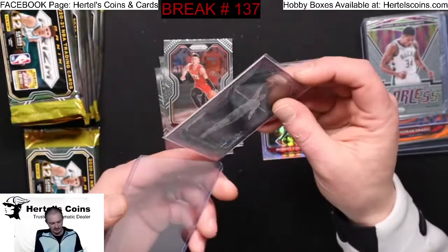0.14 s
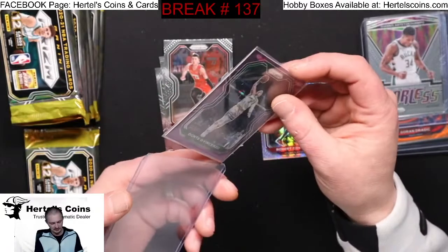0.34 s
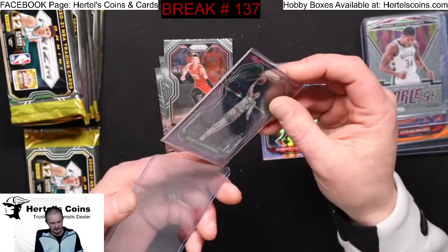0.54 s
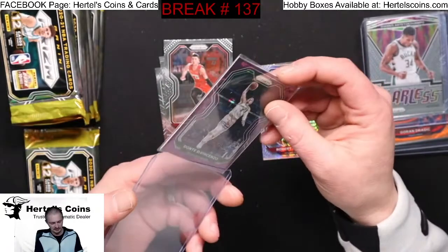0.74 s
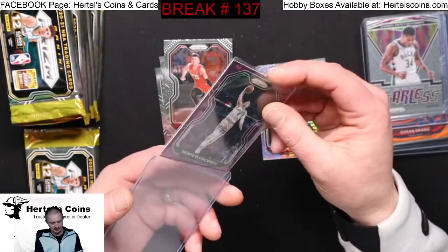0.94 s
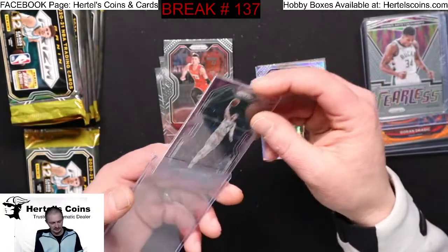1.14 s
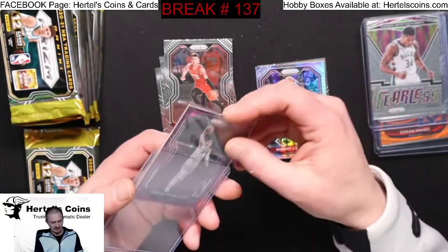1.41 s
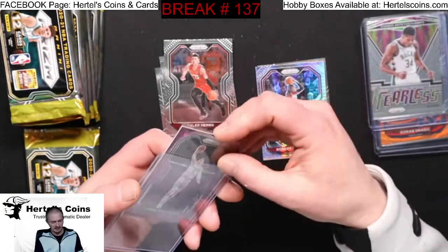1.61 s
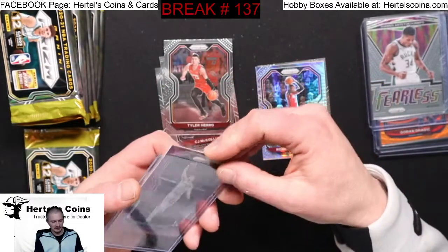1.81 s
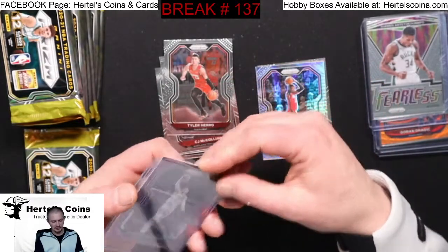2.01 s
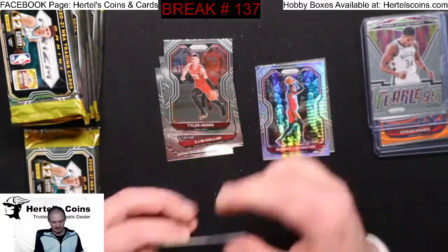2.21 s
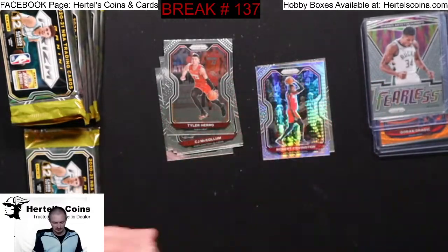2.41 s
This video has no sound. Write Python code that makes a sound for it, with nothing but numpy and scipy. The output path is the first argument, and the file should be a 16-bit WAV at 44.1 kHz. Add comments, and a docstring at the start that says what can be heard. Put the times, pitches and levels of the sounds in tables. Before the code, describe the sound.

A trading card is worked into a thin plastic sleeve, with faint hissing strokes and small crisp snaps, then knocked once, very loudly, on a table; small quiet room with low hum, close microphone.

```python
"""Card into a sleeve, then onto the table

In a small room with a low hum, close to the microphone, a trading card is worked into a thin plastic sleeve.
Its edge ticks and its strokes hiss (filtered noise with stick-slip grains); the plastic snaps in short bursts.
Hands bump the table softly (dull noise bursts and a decaying low mode); then the sleeved card is knocked
hard on the table top, which rings (decaying modes) and sets the microphone stand booming (two low modes).
"""
import sys
import numpy as np
from scipy import signal
from scipy.fft import rfft, irfft
from scipy.io import wavfile

SR = 44100
rng = np.random.default_rng(int(sys.argv[2]) if len(sys.argv) > 2 else 0)


def dump(signal):
    """Clip the signal to [-1, 1] and save it as 16-bit WAV at the path in sys.argv[1]."""
    limited = np.clip(np.atleast_2d(signal).T, -1, 1)
    pcm = np.round(limited * 32767).astype(np.int16)
    wavfile.write(sys.argv[1], SR, pcm)


N = 112454
T = np.arange(N) / SR  # time in seconds
HZ = np.maximum(np.arange(N // 2 + 1) * SR / N, 1)  # frequency of each spectrum bin
MIC_WIDTH = 0.44  # side part against mid in the stereo noise
CARD_PAN_DB = 2  # the card and sleeve sit slightly left
ROOM_T60_S, ROOM_GAP_S = 0.19, 0.0033  # decay by 60 dB, wait before the first reflection


def amp(db):
    """Decibels to gain."""
    return 10 ** (np.asarray(db) / 20)


def curve(points):
    """Gain at every frequency, interpolated over log frequency from (Hz, dB) points."""
    hz, db = np.array(points, float).T
    return amp(np.interp(np.log(HZ), np.log(hz), db))


def colour(x, gain):
    """Causal minimum-phase filter with the given gain shape; white noise keeps its power."""
    level = np.sqrt(np.mean(gain ** 2))
    cepstrum = irfft(np.log(gain / level + 1e-4), N)
    # folding the cepstrum onto positive times makes the filter causal
    cepstrum[1:N // 2] *= 2
    cepstrum[N // 2 + 1:] = 0
    response = irfft(np.exp(rfft(cepstrum)), N)[None, :SR // 10]
    return signal.fftconvolve(x, response, axes=1)[:, :N]


def noise(width):
    """Two channels of white noise, alike but for a side part."""
    mid, side = rng.standard_normal((2, N))
    return np.array([mid + width * side, mid - width * side]) / np.hypot(1, width)


def pan(db):
    """Channel gains for a left-minus-right level."""
    return amp(np.array([[db], [-db]]) / 2)


def fade(start, decay):
    """Sudden start, exponential decay."""
    return (T >= start) * np.exp(-np.maximum(T - start, 0) / decay)


def swell(peak, rise, fall):
    """A rounded rise to a peak and fall from it."""
    distance = np.maximum((peak - T) / rise, (T - peak) / fall)
    return np.exp(-distance ** 1.2)


def ring(start, modes, rise):
    """Decaying modes that build up after a blow."""
    age = np.maximum(T - start, 0)
    total = 0
    for hz, db, t60 in modes:
        decay = np.exp(-np.log(1000) * age / t60)
        total = total + amp(db) * np.sin(2 * np.pi * hz * age) * decay
    return (1 - np.exp(-age / rise)) * total


def room(x, wet_db):
    """Adds the short diffuse answer of the room: convolution with decaying noise."""
    tail = noise(MIC_WIDTH) * fade(ROOM_GAP_S, ROOM_T60_S / np.log(1000))
    tail = tail[:, :SR // 2]
    tail = tail / np.sqrt(np.sum(tail ** 2) / 2)
    return x + amp(wet_db) * signal.fftconvolve(x, tail, axes=1)[:, :N]


# Spectrum of the room's rumble and hiss. Each row: frequency in Hz, relative gain in dB.
AIR_COLOUR = [(20, -15), (31, -2.5), (42, 6), (62, -1), (78, -11), (115, -10.5), (150, -13), (200, -13),
              (335, -16), (450, -22.5), (640, -25), (1100, -31), (2000, -37), (5000, -42.5), (16000, -42.5)]
# Hum tones of the room. Each row: frequency in Hz, level in dB.
HUM_TONES = [(59.5, -66), (119.5, -74.5), (272, -83.5), (490, -83)]
AIR_DB, AIR_WIDTH, HUM_PAN_DB = -59.5, 0.57, -10
AIR_BASS_PAN_DB, AIR_BASS_HZ = 6, 111  # the rumble leans left, less so as pitch rises


def background():
    """Room rumble and faint hiss as shaped noise, and an electrical hum of steady sines."""
    air = amp(AIR_DB) * colour(noise(AIR_WIDTH), curve(AIR_COLOUR))
    lean_db = AIR_BASS_PAN_DB / (1 + (HZ / AIR_BASS_HZ) ** 2)
    air = irfft(rfft(air) * amp(np.array([lean_db, -lean_db]) / 2), N)
    hum = 0
    for hz, db in HUM_TONES:
        hum = hum + amp(db) * np.sqrt(2) * np.sin(2 * np.pi * (hz * T + rng.random()))
    return air + pan(HUM_PAN_DB) * hum


# Jolts of the table, before they reach the stand. Each row: time in seconds, level in dB.
JOLTS = [(0.237, -34.5), (.31, -47), (0.783, -44), (1.124, -46.5), (1.163, -42), (1.255, -40.5),
         (1.411, -43), (1.466, -41.5), (1.584, -47), (2.4786, -9.5)]
# Resonances of the microphone stand. Each row: frequency in Hz, level in dB, 60 dB decay in seconds.
STAND_MODES = [(52.6, -0.5, .23), (40, -14, 0.49)]
STAND_RISE_S, STAND_LAG_S, STAND_PAN_DB = 0.0087, 0.01, 11.5


def stand():
    """Jolts of the table reach the microphone stand a moment later and make it boom, mostly on the left."""
    boom = sum(amp(db) * ring(s + STAND_LAG_S, STAND_MODES, STAND_RISE_S) for s, db in JOLTS)
    return -pan(STAND_PAN_DB) * boom


# Soft bumps of the hands on the table. Each row: start in seconds, level in dB.
BUMPS = [(0.2299, -48.5), (0.782, -51), (1.379, -55.5), (1.407, -58.5)]
# Spectrum of a bump. Each row: frequency in Hz, relative gain in dB.
BUMP_COLOUR = [(100, 2), (300, -6.5), (440, 11), (560, -7.5), (750, -8.5), (1200, -14), (2000, -31),
               (8000, -43)]
# Dull thumps of the fingers. Each row: start in seconds, level in dB.
THUMPS = [(2.215, -47.5)]
# Resonance of a thump. Each row: frequency in Hz, level in dB, 60 dB decay in seconds.
THUMP_MODES = [(114, 2, 0.1)]
BUMP_DECAY_S = 0.0072


def hands():
    """Padded contacts: hands give short dull noise bursts, fingers a low decaying mode."""
    bump_level = sum(amp(db) * fade(s, BUMP_DECAY_S) for s, db in BUMPS)
    bumps = colour(noise(MIC_WIDTH) * bump_level, curve(BUMP_COLOUR))
    thumps = sum(amp(db) * ring(s, THUMP_MODES, rise=0.0038) for s, db in THUMPS)
    return bumps + thumps


GRAINS_PER_S, GRAIN_SHARE = 1800, 0.3  # share of the power in grains, the rest is smooth rub
CATCH_PER_S, CATCH_DB = 75, 1.5  # how often the grip is redrawn, and its spread


def friction():
    """Dense stick-slip grains over a smooth rub that catches and lets go."""
    hits = rng.random(N) < GRAINS_PER_S / SR
    grains = hits * rng.standard_normal(N) * np.sqrt(SR / GRAINS_PER_S)
    grip_db = CATCH_DB * np.interp(T * CATCH_PER_S, np.arange(N), rng.standard_normal(N))
    rub = noise(MIC_WIDTH)
    return amp(grip_db) * (np.sqrt(GRAIN_SHARE) * grains + np.sqrt(1 - GRAIN_SHARE) * rub)


# Strokes of the card inside the sleeve, close to the microphone. Each row: peak time in seconds,
# level in dB, rise in seconds, fall in seconds, tilt in dB per octave, edge rasp in dB.
STROKES = [(.69, -70, 0.038, 0.022, -1, -8), (.765, -71, 0.018, 0.028, -3.5, 0),
           (.868, -69, .008, 0.0096, 1.5, -12), (1.01, -70.5, 0.028, 0.056, 1, 0),
           (1.19, -63.5, .11, 0.2, 1.5, -2), (1.40, -78, 0.021, .04, 2, 10),
           (1.487, -65.5, 0.037, 0.018, 0.5, 4.5), (1.579, -66.5, 0.022, 0.074, -0.5, 10),
           (1.702, -59.5, 0.038, 0.054, -0.5, 4.5), (1.874, -67, 0.073, .04, -3, 3),
           (2.006, -64, 0.061, 0.023, -3.5, -11), (2.041, -63, 0.014, 0.024, -1, 0),
           (2.21, -69, 0.11, 0.076, -3.5, 4.5), (2.441, -72, 0.081, 0.09, -5.5, 0)]
# Spectrum of the sliding card. Each row: frequency in Hz, relative gain in dB.
SLIDE_COLOUR = [(500, -15), (1500, -9), (3500, -5), (5500, -5), (7000, -0.5), (10500, -2.5), (14000, -2.5),
                (16000, -9.5)]
# The sleeve flexing under the fingers. Each row: peak time in seconds, level in dB, rise in seconds,
# fall in seconds.
FLEXES = [(1.237, -49, 0.00084, 0.0027), (1.7103, -45.5, .0007, 0.0012), (1.7182, -50, 0.00098, 0.0027),
          (1.7227, -48.5, 0.0015, 0.0055), (1.8437, -54.5, .001, .003), (1.9639, -53.5, .001, 0.0027),
          (2.015, -56, .002, 0.0027), (2.176, -57, 0.0012, 0.011), (2.215, -56.5, 0.0072, 0.0088),
          (2.22, -46.5, 0.0029, 0.0047)]
# Spectrum of the flexing plastic. Each row: frequency in Hz, relative gain in dB.
FLEX_COLOUR = [(300, -9), (1050, -3), (1380, -1.5), (1600, -5), (1800, 5), (2000, -2.5), (2400, -3),
               (4700, -0.5), (5800, -9.5), (7500, 2.5), (11000, -12), (16000, -12)]
SLIDE_PIVOT_HZ, SLIDE_WET_DB = 8000, -10.5  # where the tilt is zero, level of the room's answer
RASP_HZ, RASP_WIDTH_HZ = 8100, 680


def sleeve():
    """The card slides in by strokes, its edge rasping; the sleeve creaks briefly where it is bent."""
    rub, shape = friction(), curve(SLIDE_COLOUR)
    octaves = np.log2(np.maximum(HZ, 1000) / SLIDE_PIVOT_HZ)
    rasp = 1 / (1 + ((HZ - RASP_HZ) / RASP_WIDTH_HZ) ** 2)
    slide = 0
    for s, db, rise, fall, tilt, rasp_db in STROKES:
        stroke_shape = shape * amp(tilt * octaves + rasp_db * rasp)
        slide = slide + amp(db) * colour(rub * swell(s, rise, fall), stroke_shape)
    flex_level = sum(amp(db) * swell(s, rise, fall) for s, db, rise, fall in FLEXES)
    flex = colour(friction() * flex_level, curve(FLEX_COLOUR))
    return room((slide + flex) * pan(CARD_PAN_DB), SLIDE_WET_DB)


# Snaps of card edge and sleeve, close to the microphone. Each row: start in seconds, level in dB,
# centre in Hz, spread in octaves, decay in seconds.
TICKS = [(0.2819, -53.5, 6500, 1.3, 0.0025), (.661, -54.5, 10200, 1.5, 0.0023),
         (0.7752, -55, 8100, 0.6, 0.0031), (1.2354, -41.5, 8300, 0.4, 0.0012),
         (1.705, -44.5, 8900, 1.1, 0.0041), (1.7115, -28.5, 9260, 0.54, 0.0022),
         (1.8427, -47, 5370, 0.74, 0.0028), (1.85, -53, 5900, 0.47, 0.0028),
         (1.8742, -53.5, 6200, 0.71, 0.0013), (1.9642, -48.5, 4360, 0.39, 0.0018),
         (2.019, -38, 11900, 0.94, 0.0033), (2.112, -61, 7500, 1.2, 0.0021),
         (2.149, -63.5, 5730, 1.8, 0.0061), (2.2687, -63, 1550, .6, 0.0078)]
TICK_SPIKE, TICK_WET_DB = 0.36, -10.5  # spike against chatter, level of the room's answer


def ticks():
    """Each snap is a spike and a few milliseconds of chatter in the stiff plastic."""
    out = 0
    for s, db, hz, spread, decay in TICKS:
        snap = noise(MIC_WIDTH) * fade(s, decay)
        snap[:, int(s * SR)] += TICK_SPIKE * np.sqrt(decay * SR)
        band = 1 / (1 + (np.log2(HZ / hz) / spread) ** 2)
        out = out + amp(db) * colour(snap, band)
    return room(out * pan(CARD_PAN_DB), TICK_WET_DB)


# The card's edge lands on the table, then its other corner. Each row: start in seconds, level in dB.
CONTACTS = [(2.478, 3), (2.4809, -7.5)]
# Clack of the card. Each row: frequency in Hz, level in dB, 60 dB decay in seconds.
CARD_MODES = [(1090, -11.5, 0.0076), (1390, -12, 0.013)]
# Spectrum of the crack. Each row: frequency in Hz, relative gain in dB.
CRACK_COLOUR = [(300, 10.5), (1000, 4), (1400, 9), (1800, -7), (2700, 0), (4200, -8.5), (6000, -7.5),
                (7500, -14), (8800, -7.5), (11000, -18), (16000, -27)]
# Resonances of the table top. Each row: frequency in Hz, level in dB, 60 dB decay in seconds,
# left minus right in dB.
TABLE_MODES = [(206.2, -30.5, 0.58, 22.5), (290.5, -25, 0.21, -2), (385.3, -13, 0.048, -9.5),
               (613.5, -11, 0.071, 6.5), (708, -18.5, 0.064, 14), (872, -26, 0.055, 2),
               (1040, -26.5, .07, 0), (1417, -32, 0.086, -1), (1530, -46, 0.043, 1), (1880, -47, 0.15, 0),
               (2226, -36.5, 0.22, 0), (2924, -27, 0.042, -5), (2865, -33, 0.083, -9)]
# Spectrum of the room's answer to the knock. Each row: frequency in Hz, relative gain in dB.
TAIL_COLOUR = [(60, 0), (105, 4), (155, -5.5), (280, 7), (700, 2.5), (1400, -6.5), (1750, -11.5),
               (3700, -18), (6000, -30.5), (10000, -35), (16000, -51)]
CONTACT_S, PUSH_DB, CRACK_DB, CRACK_S, RING_RISE_S = 0.00081, -5, -13, 0.0016, 0.00055
TAIL_DB, TAIL_T60_S, TAIL_WIDTH = -18.5, 0.23, 0.7


def table():
    """Each contact gives a push, a crack and a clack of the card; the first rings table top and room."""
    out, first = 0, CONTACTS[0][0]
    for s, db in CONTACTS:
        push = amp(PUSH_DB) * np.sin(np.pi * np.clip((T - s) / CONTACT_S, 0, 1)) ** 2
        crack = amp(CRACK_DB) * colour(noise(MIC_WIDTH) * fade(s, CRACK_S), curve(CRACK_COLOUR))
        clack = ring(s + CONTACT_S / 4, CARD_MODES, rise=.0001)
        out = out + amp(db) * (crack - push - clack)
    top = 0
    for hz, db, t60, side_db in TABLE_MODES:
        top = top + pan(side_db) * ring(first, [(hz, db, t60)], RING_RISE_S)
    tail = noise(TAIL_WIDTH) * fade(first + ROOM_GAP_S, TAIL_T60_S / np.log(1000))
    return out - top + amp(TAIL_DB) * colour(tail, curve(TAIL_COLOUR))


def scene():
    """All sounds at the microphone."""
    return background() + stand() + hands() + sleeve() + ticks() + table()


TOP_HZ = 16000


def record(dry):
    """The recorder clips just below full scale, then a steep low-pass cuts the top."""
    clipped = np.clip(dry, -.97, .97)
    low_pass = signal.ellip(10, .2, 80, TOP_HZ, fs=SR, output="sos")
    return signal.sosfilt(low_pass, clipped)


dry = scene()
out = record(dry)
dump(out)
```